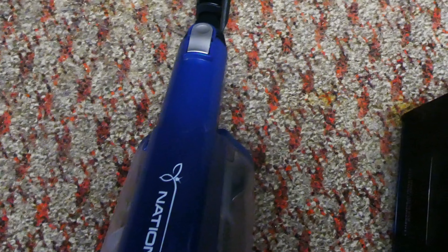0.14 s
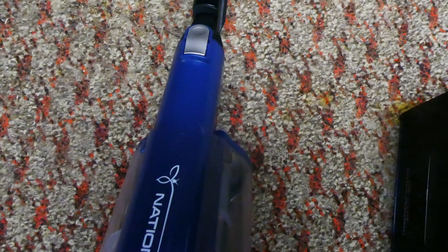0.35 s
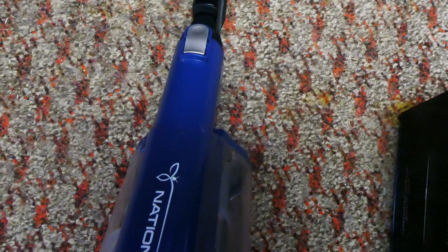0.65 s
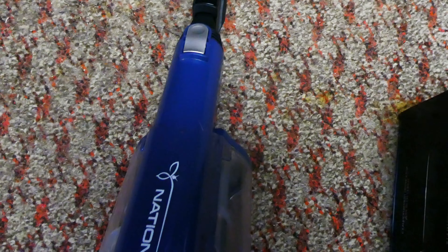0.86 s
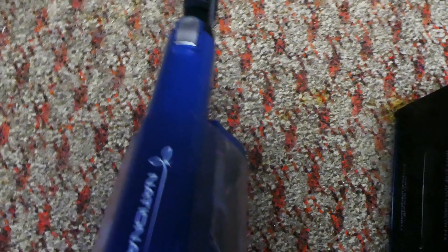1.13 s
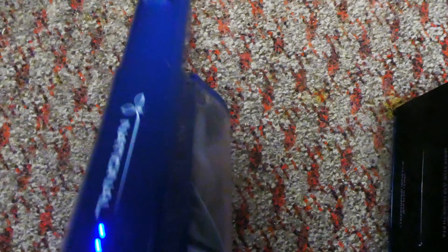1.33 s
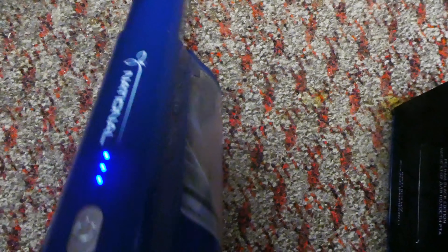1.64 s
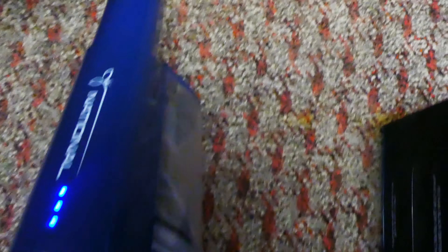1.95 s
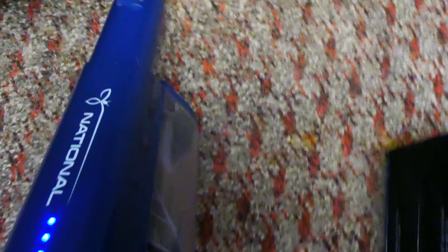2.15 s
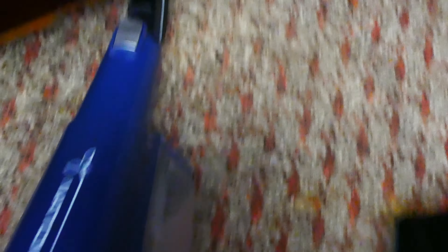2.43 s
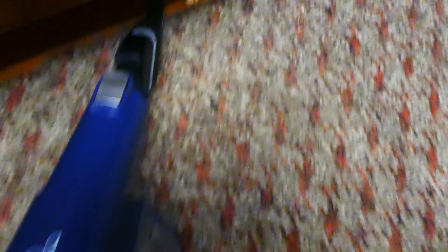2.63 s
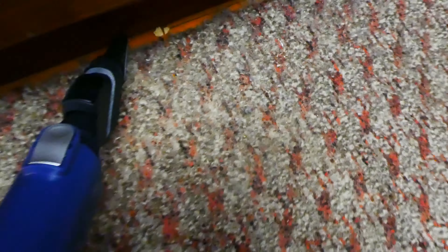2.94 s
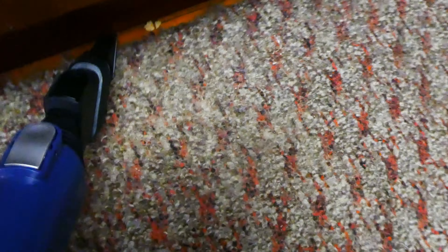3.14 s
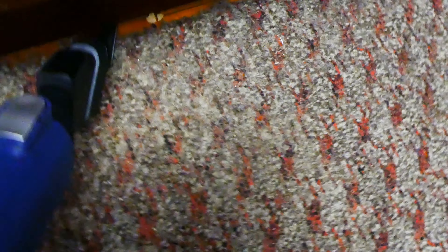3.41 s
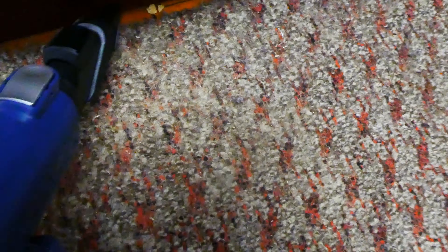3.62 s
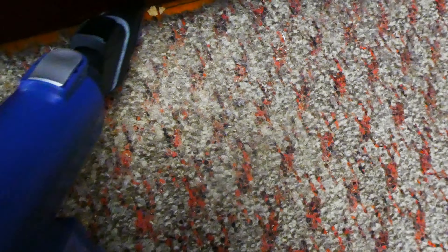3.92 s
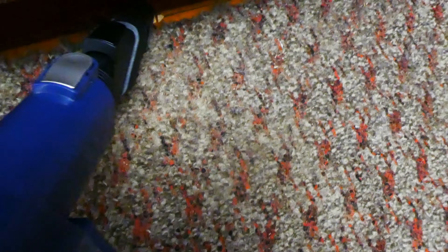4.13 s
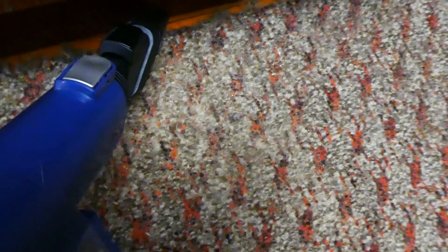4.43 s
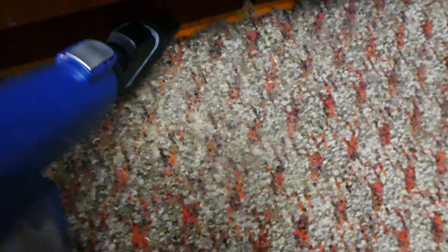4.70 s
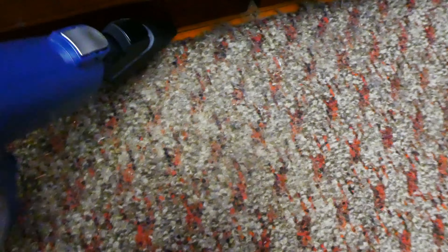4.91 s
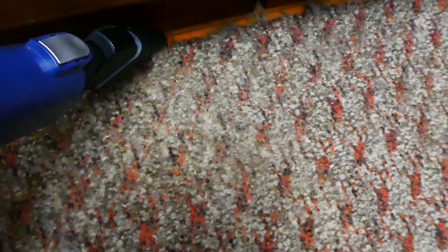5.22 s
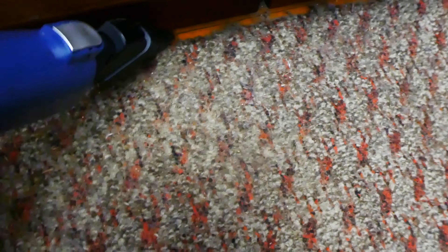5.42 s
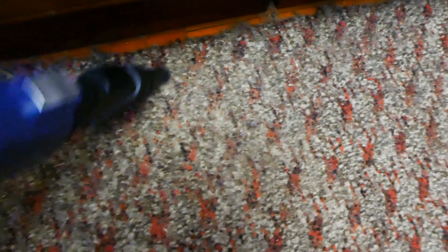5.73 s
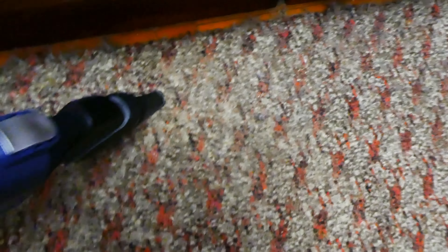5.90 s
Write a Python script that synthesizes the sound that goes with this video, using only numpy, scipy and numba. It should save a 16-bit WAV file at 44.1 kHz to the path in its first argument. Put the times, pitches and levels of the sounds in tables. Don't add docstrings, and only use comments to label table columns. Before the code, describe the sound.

Dry switch clicks in a quiet room, then a small cordless vacuum motor whines upward fast into a steady loud rush of air.

```python
import sys
import numpy as np
from scipy import signal
from scipy.fft import rfft, irfft
from scipy.io import wavfile
from scipy.ndimage import uniform_filter1d
from numba import njit

SR = 44100
rng = np.random.default_rng(int(sys.argv[2]) if len(sys.argv) > 2 else 0)


def ratio_of_db(decibels):
    return 10 ** (np.asarray(decibels, float) / 20)


def generate_wav(signal):
    frames = np.transpose(np.atleast_2d(signal))
    scaled = np.clip(frames, -1, 1) * 32767
    pcm = np.round(scaled).astype(np.int16)
    wavfile.write(sys.argv[1], SR, pcm)


N = 267334
TIME = np.arange(N) / SR
SIDES = np.array([[1.], [-1.]])

KICK_S = .58
FULL_POWER_S, RAMP_PER_S2, TOP_SPEED = 1.26, 536, 448.46
SAG_S, SAG_PER_S2 = 4.256, 1.24
# speed still to gain in turns per s, time constant in s.
SETTLING = ((39.25, .103), (67.95, .315))

# time in s, level in dB.
HUM = [(.85, -71), (1.05, -38), (1.14, -33), (1.35, -14), (1.5, -21), (1.59, -27.5), (1.78, -24),
       (1.88, -38), (2.08, -25), (2.2, -21), (2.4, -21), (2.7, -17), (3.55, -16), (4.45, -16), (4.68, -13),
       (5.0, -12), (6.03, -15.5)]
# time in s, left minus right in dB.
HUM_PAN = [(1, 1), (1.6, 5), (2.2, 1.6), (3.1, 5.5), (6, 5.5)]
# start in s, hum gain in dB, decay in s.
NUDGES = [
    (3.6, 6, 0.16),
    (3.955, 6, 0.1),
    (4.3, 3.5, 0.16),
]
# time in s, facing (positive towards, negative away).
FACING = [(1.7, 2.5), (2.3, 1.86), (2.75, 1.56), (3.0, 0.92), (3.4, 0.63), (3.85, 0.65), (4.2, 0.86),
          (4.65, 0.19), (4.8, -0.6), (5.2, -1.96), (5.6, -1.46), (6.0, -2)]

TONES = {"second": (-40, -0.3, 1, 4), "third": (-31, 2.5, 33, 1), "bearing": (-39, 5.5, 10.5, 1.5),
         "blade": (-25, 2.5, 12.5, 9.5), "5th": (-29.5, 2, 13, 7), "10th": (-30, 0, 6, 8),
         "15th": (-37.5, 3.5, 24, -8), "20th": (-40, 0.5, 33, -8), "30th": (-49.5, -1, 35, -5),
         "4th": (-39, -0.5, 9, 3), "14th": (-43, 0.5, 4.5, 1)}
FADES = {"second": [(1.27, -2, .06), (2.6, 5, 0.9), (4.8, 12, 0.075)], "third": [(1.3, 10, 0.081),
         (4.82, 22, 0.19), (5.8, 13, 0.16)], "bearing": [(1.35, 7.5, 0.21), (3.1, 8, 0.34)],
         "4th": [(1.95, 27, 0.26)], "14th": [(2.9, -7, .12), (4.85, 12, 0.089)], "blade": [(1.0, -10.5, .1),
         (2.45, 3, 0.26), (2.7, 10, 0.14), (3.1, -1.5, 0.41)], "5th": [(1.4, 8, 0.2), (3.2, 8.5, 0.31),
         (5.5, 12, .15), (5.8, -4, 0.053)], "10th": [(1.9, 12, 0.51), (4.8, 3, .08)],
         "15th": [(1.25, 7, .13), (1.84, 14, 0.14), (2.42, 10, 0.066), (4.3, 10, 0.19), (5.95, -13, 0.29)],
         "20th": [(2.4, 0, 0.2), (5.2, 3, 0.073)], "30th": [(4.15, 6, .25), (5.6, 10, .1)],
         "whistle": [(2.2, 10, 0.29), (2.7, 14, .2), (4.1, 25, 0.21), (4.7, 15, .15), (5.95, 9, 0.48)]}
# centre in Hz, width in Hz, gain in dB.
SHELL = [(686, 130, 14.5), (775, 44, -9), (872, 26, 10), (1670, 160, 4), (2297, 125, 4.5), (2945, 270, 3.5),
         (3630, 410, -6.5), (6550, 340, 5), (7900, 850, -2.5), (12980, 350, 24)]
SHELL_LOW_HZ = 300
# multiples of the turn, levels above it in dB.
WITH_SECOND = ((6, 9), (-5, -9))
# multiples of the turn, levels above it in dB.
WITH_BLADE = ((8,), (-25,))
# multiples of the turn, levels above it in dB.
WITH_BEARING = ((50 / 7,), (-10,))
# multiples of the turn, levels above it in dB.
WITH_20TH = ((25, 11, 12, 21), (-2, -9, -12, -9))
# time in s, level in dB.
BEARING_SECOND = [(.74, -45), (1.0, -34), (1.2, -34.5), (1.34, -22.5), (1.5, -30), (1.64, -42), (2.5, -57),
                  (3, -36), (3.7, -59.5)]

DRIVE_HZ = 4984.5
# time in s, level in dB.
WHISTLE = [(.5, -43), (.62, -49.5), (.74, -42.5), (1.1, -39), (1.18, -34.5), (1.45, -32), (1.75, -34)]
# whistle multiple, turn multiple,
# level at run-up in dB, level at speed in dB.
DRIVE_SIDES = [(2, 0, -3, -24), (3, 0, -14, -30), (1, -5, 1, -9), (1, 5, -6, -17), (1, -10, -5, -30),
               (1, -15, -14, -80), (2, -5, -14, -90), (1, 5 / 2, -12, -40)]

# time in s, rush in dB.
FLOW = [(.56, -43), (.64, -33), (.72, -20.5), (.8, -18), (.95, -9.5), (1.2, -9.5), (1.45, -3.5), (2, -1.5),
        (2.7, 0), (4.55, 1.44), (6.03, 0.15)]
FLOW_HZ = (450, 1600, 4000, 9000)
# frequency in Hz, level in dB per Hz.
AIR = [(40, -98), (100, -81), (200, -63.5), (340, -56), (700, -60), (1000, -65.5), (1500, -58.5),
       (2700, -62.5), (3600, -65), (5500, -66), (8000, -71), (10000, -70), (13000, -76), (16000, -81)]
# frequency in Hz, correlation (0 to 1).
ALIKE = [(60, 0.15), (130, 0.83), (290, 0.85), (640, 0.79), (1410, 0.74), (3100, 0.73), (6820, 0.71),
         (15000, 0.047)]
# level in dB, dB per unit of facing,
# dB per unit of missing speed, dB per its cube.
TILTS = [
    (0.44, 1.54, 15.5, -10.5),
    (0.8, 0.11, 9.5, -22),
    (2.5, 1.6, -4.5, 0),
    (-.5, 2.2, -4, 0.5),
]
# centre in Hz, width in Hz, level in dB.
DUCT = [(378, 18, 6), (674, 190, -16.5), (1182, 214, 0), (1756, 150, -4), (2406, 236, 0), (3570, 220, -3.5),
        (4290, 110, -7)]
AIR_PAN_DB, AIR_PAN_PER_FACING = 4, -1.44

# start in s, peak in dB, knock above it in dB, crack above it in dB.
CLICKS = [
    (.036, -36, -8, 3.5),
    (.413, -31.5, -13, 3),
    (.482, -36.5, -1.5, 0),
    (.580, -35, -10, 4),
    (.877, -3, 1, -17),
]
# frequency in Hz, level in dB, 60 dB decay time in s.
HOUSING = [(1123, 1.5, 0.016), (820, -34, .015), (5070, -19, .008), (10500, -20, .006)]
# start in s, peak in dB, centre in Hz, width in Hz, length in s.
GRIT = [
    (4.706, -16, 11000, 6000, .0015),
    (4.7115, -9, 8000, 9000, 0.0028),
    (4.7207, -8.5, 9900, 9000, 0.0034),
    (4.724, -6.5, 2630, 1300, 0.004),
    (4.73, -17, 11000, 6000, .0015),
    (4.7745, 0.5, 8900, 6850, 0.0026),
    (4.7748, -5, 5200, 1500, 0.0022),
    (4.934, -10.5, 5330, 300, 0.0019),
]
# time in s, level in dB.
SCRAPE = [(4.66, -45), (4.70, -23), (4.725, -18), (4.735, -18), (4.76, -55)]

# frequency in Hz, level in dB per Hz.
ROOM_MID = [(18, -45), (30, -15), (134, 0), (512, -1.5), (4650, -8.5), (7870, -12.5), (14800, -16),
            (16000, -14)]
# frequency in Hz, level in dB per Hz.
ROOM_SIDE = [(18, -50), (30, -17), (426, -8), (526, -16), (584, -14), (16000, -44)]
ROOM_MID_DB, ROOM_SIDE_DB = -58.5, -51

# start in s, depth in dB, recovery in s.
DUCKS = [
    (4.727, 6, 0.23),
    (4.778, 6, 0.1),
]
# centre in Hz, width in Hz, loss in dB.
PORT_DIPS = [(6580, 650, 4.5), (8030, 350, 13), (10820, 990, 6), (12860, 900, 16)]
TOP_HZ = 15200


def rotation():
    since = TIME - FULL_POWER_S
    missing = sum(gap * np.exp(-np.maximum(since, 0) / tau) for gap, tau in SETTLING)
    ramp = RAMP_PER_S2 * np.minimum(since, 0)
    sag = SAG_PER_S2 * np.maximum(TIME - SAG_S, 0)
    speed = np.maximum(TOP_SPEED - missing + ramp - sag, 12) * (TIME > KICK_S)
    jitter = 1 + 0.00021 * walk(40.03)
    return speed, np.cumsum(speed * jitter) / SR


def motor(speed, turn):
    load = np.clip(speed / 400, 0, 1) ** 2
    out = shaft(speed, turn) + bearing(speed, turn) + blades(speed, turn) + windings(speed, turn)
    return out + rattle(turn, range(22, 34), -85 + 29 * load, 2.) + drive(turn, load)


def shaft(speed, turn):
    nudged = 0
    for s, db, decay in NUDGES:
        since = TIME - s
        nudged = nudged + db * np.exp(-np.maximum(since, 0) / decay) * np.clip(since / 0.014, 0, 1)
    fade = np.clip((TIME - HUM[0][0]) * 100, -100, 0)
    pressed = np.interp(TIME, [4.7, 4.8], [1.3, .5])
    hum_db = curves(HUM)[0] + nudged + fade + pressed * walk(45)
    out = tone(turn, hum_db, 0, curves(HUM_PAN)[0], 0.17, 0)
    second_db = strength("second", speed, 2)
    out += tone(2 * turn, second_db)
    out += tone(3 * turn, strength("third", speed, 3) + 2.0 * walk(40), 0.29, 2.7)
    out += tone(4 * turn, strength("4th", speed, 4), 3.9)
    return out + followers(turn, second_db, WITH_SECOND)


def bearing(speed, turn):
    db = strength("bearing", speed, 18 / 7)
    out = tone(18 / 7 * turn, db + 2.15 * walk(40.04), 1.3)
    out += tone(36 / 7 * turn, curves(BEARING_SECOND, before=-200)[0], 2.)
    return out + followers(turn, db, WITH_BEARING)


def blades(speed, turn):
    db = strength("blade", speed, 7)
    out = tone(7 * turn, db, 0.87, np.interp(TIME, [4.7, 5], [-1, 12]), 0.062)
    out += tone(14 * turn, strength("14th", speed, 14), 1.3)
    out += tone(35 * turn, np.interp(TIME, [1.3, 1.55, 1.9, 2.1], [-90, -51, -48, -44]), 4.)
    return out + followers(turn, db, WITH_BLADE)


def windings(speed, turn):
    out = tone(5 * turn, strength("5th", speed, 5), 0.57, 6.6, 0.49)
    out += tone(10 * turn, strength("10th", speed, 10), 0.85, 3.7)
    out += tone(15 * turn, strength("15th", speed, 15))
    db = strength("20th", speed, 20)
    out += tone(20 * turn, db)
    out += tone(30 * turn, strength("30th", speed, 30), 2.4, 1., -1.6)
    return out + followers(turn, db, WITH_20TH)


def drive(turn, load):
    onset = np.interp(TIME, [.505, .509, .56], [-60, -9, 0])
    whistle_db = curves(WHISTLE)[0] - fades("whistle") + onset
    out = tone(DRIVE_HZ * TIME, whistle_db, 0.93)
    spread = np.interp(TIME, [KICK_S, .61, .68], [-60, -10, 0])
    for m, k, early_db, late_db in DRIVE_SIDES:
        side_db = whistle_db + early_db + load * (late_db - early_db)
        out += tone(m * DRIVE_HZ * TIME + k * turn, side_db + (spread if k else 0), 1.5)
    return out


def strength(name, speed, order):
    db, aim_db, octave_db, soft_db = TONES[name]
    hz = order * speed
    shell = sum(g / (1 + (2 * (hz - centre) / width) ** 2) for centre, width, g in SHELL)
    shell = shell - 20 * np.log10(1 + (SHELL_LOW_HZ / (hz + 1)) ** 2)
    growth = octave_db * np.log2((speed + 1) / TOP_SPEED)
    soft = soft_db * np.clip((FULL_POWER_S - TIME) / .01, 0, 1)
    turning = np.where(TIME > KICK_S, 0, -200)
    return db + aim_db * curves(FACING)[0] + growth - soft + shell - fades(name) + turning


def fades(name):
    return sum(db * np.exp(-((TIME - s) / half) ** 2) for s, db, half in FADES[name])


def followers(turn, leader_db, table):
    return sum(tone(k * turn, leader_db + db, 2.8) for k, db in zip(*table))


def rattle(turn, multiples, db, scatter_db):
    return sum(tone(k * turn, db + scatter_db * rng.standard_normal(), 1.2) for k in multiples)


def air(speed, turn):
    low, facing, slack = curves(FLOW)[0], curves(FACING)[0], 1 - speed / TOP_SPEED
    mid, hiss, top, ring_db = (db + aim * facing + a * slack + b * slack ** 3 for db, aim, a, b in TILTS)
    rise = np.clip((TIME - FLOW[0][0]) * 300, -100, 0)
    ring_db = ring_db + np.interp(TIME, [1.2, 2.6], [-52, -62])
    rush = ratio_of_db(-3.5) * turbulence(np.array([0 * low, mid, hiss, top]))
    per_hz = np.sqrt(SR / 2)
    both = per_hz * ratio_of_db(low + rise) * (rush + ratio_of_db(ring_db) * duct(turn))
    return pan(both, AIR_PAN_DB + AIR_PAN_PER_FACING * facing)


def turbulence(tilt):
    out, swell = 0, walk(5.89)
    for hz in 40 * 2 ** np.arange(0, 8.7, 1 / 3):
        share = [np.interp(np.log(hz), np.log(FLOW_HZ), row) for row in np.eye(4)]
        alike = np.clip(at_hz(ALIKE, hz), -.9, .99)
        a, b = (resonance(rng.standard_normal(N), hz, hz / 3, hz / 3) for _ in range(2))
        db = at_hz(AIR, hz) + share @ tilt + .9 * swell + 1.3 * walk(12)
        out = out + ratio_of_db(db) * (np.sqrt(1 + alike) * a + SIDES * np.sqrt(1 - alike) * b)
    return out


def duct(turn):
    climbing = np.interp(TIME, [1.25, 1.5], [-20, -40])
    faults = (4, 6, 43 / 7, 54 / 7, 8, 64 / 7, 68 / 7, 11, 12)
    push = rng.standard_normal(N) + rattle(turn, faults, climbing, 2.3)[0]
    return sum(ratio_of_db(db) * resonance(push, hz, 1.07 * width, 1.07 * width) for hz, width, db in DUCT)


def clicks():
    out, t = np.zeros(N), TIME[:1500]
    for s, db, knock_db, crack_db in CLICKS:
        knock = 0
        for hz, g, t60 in HOUSING:
            decay = np.exp(-np.log(1000) * t / t60)
            knock = knock + ratio_of_db(g) * np.sin(2 * np.pi * hz * t) * np.minimum(t / 0.00086, 1) * decay
        crack = svf(rng.standard_normal(len(t)), 4000., 12000.) * np.exp(-t / 0.0043) / 2
        i = int(s * SR)
        out[i:i + len(t)] += ratio_of_db(db) * (ratio_of_db(knock_db) * knock + ratio_of_db(crack_db) * crack)
    return pan(out, 1.)


def grit():
    out, t = np.zeros((2, N)), TIME[:1500]
    for s, db, hz, width, length in GRIT:
        burst = t / length * np.exp(1 - (t / length) ** 2)
        a, b = (resonance(rng.standard_normal(len(t)) * burst, hz, width, 2. * width) for _ in range(2))
        i = int(s * SR)
        out[:, i:i + len(t)] += ratio_of_db(db) * (a + 0.46 * SIDES * b) / np.max(np.abs(a))
    rasp = svf(rng.standard_normal(N) * ratio_of_db(3.4 * walk(600)), 3500., 8300.0)
    scraping = ratio_of_db(curves(SCRAPE, before=-200)[0]) * (TIME < SCRAPE[-1][0])
    return out + scraping * level(rasp, 0)


def room():
    return level(coloured(ROOM_MID), ROOM_MID_DB) + SIDES * level(coloured(ROOM_SIDE), ROOM_SIDE_DB)


def tone(cycles, db, flicker_db=2.0, pan_db=2.0, lead=0.11, sway_db=3.5):
    start = 2 * np.pi * (cycles + rng.random())
    size = np.sqrt(2) * ratio_of_db(db + flicker_db * walk(14))
    return pan(size * np.sin(start + SIDES * lead / 2), pan_db + sway_db * walk(2.06))


def pan(x, db):
    return x * ratio_of_db(SIDES * db / 2)


def walk(rate):
    k = int(SR / rate)
    held = np.repeat(rng.standard_normal(N // k + 1), k)
    return 1.51 * uniform_filter1d(uniform_filter1d(held, k), k)[:N]


def coloured(points):
    hz = np.maximum(np.fft.rfftfreq(N, 1 / SR), 1)
    return irfft(rfft(rng.standard_normal(N)) * ratio_of_db(at_hz(points, hz)), N)


@njit
def svf(x, hz, width):
    y, b, l = np.empty(len(x)), 0., 0.
    g, k = np.tan(np.pi * hz / SR), width / hz
    for i in range(len(x)):
        v = (b + g * (x[i] - l)) / (1 + g * (g + k))
        b, l, y[i] = 2 * v - b, l + 2 * g * v, k * v
    return y


def resonance(x, hz, first_width, second_width):
    return svf(svf(x, 1. * hz, 1. * first_width), 1. * hz, 1. * second_width)


def curves(table, before=None):
    s, *columns = np.transpose(table)
    return [np.interp(TIME, s, c, left=before) for c in columns]


def at_hz(points, hz):
    table_hz, db = np.transpose(points)
    return np.interp(np.log(hz), np.log(table_hz), db)


def level(x, db):
    return x * ratio_of_db(db) / np.sqrt(np.mean(x ** 2))


def scene():
    speed, turn = rotation()
    return motor(speed, turn) + air(speed, turn) + clicks() + grit() + room()


def roll_off(x):
    return signal.sosfilt(signal.butter(12, 16480, fs=SR, output="sos"), x)


def record(dry):
    duck_db = 0
    for s, db, back in DUCKS:
        since = TIME - s
        duck_db = duck_db + db * np.exp(-np.maximum(since, 0) / back) * np.clip(since / 0.0029, 0, 1)
    low_pass = signal.ellip(7, .5, 45, TOP_HZ, fs=SR, output="sos")
    heard = signal.sosfilt(low_pass, dry * ratio_of_db(-duck_db))
    for hz, width, db in PORT_DIPS:
        heard = heard - (1 - ratio_of_db(-db)) * np.array([svf(side, 1. * hz, 1. * width) for side in heard])
    return roll_off(1.294 * np.tanh(heard / 1.322))


dry = scene()
out = record(dry)
generate_wav(out)
```